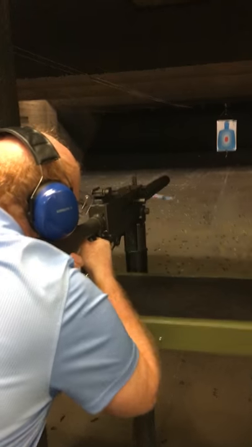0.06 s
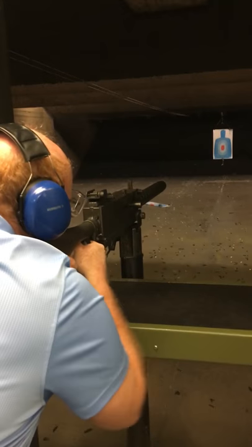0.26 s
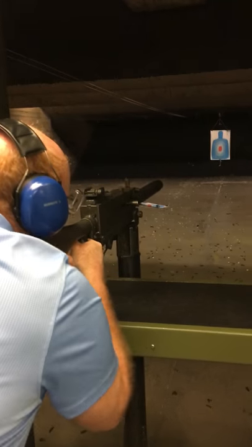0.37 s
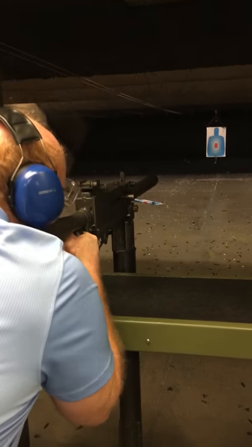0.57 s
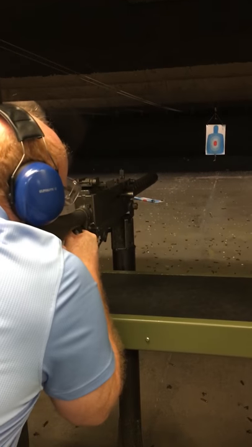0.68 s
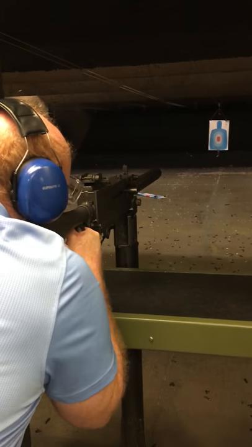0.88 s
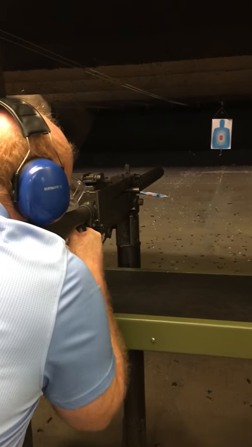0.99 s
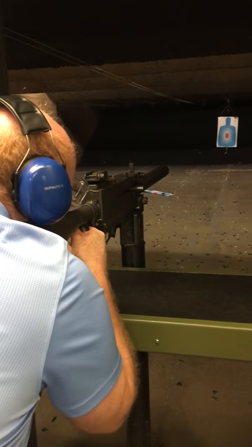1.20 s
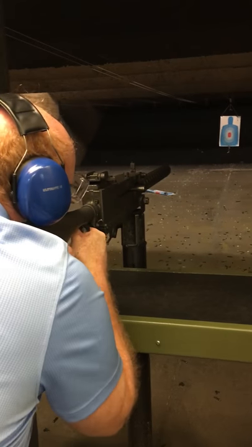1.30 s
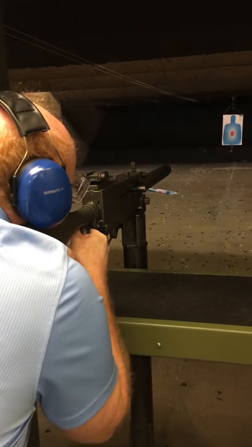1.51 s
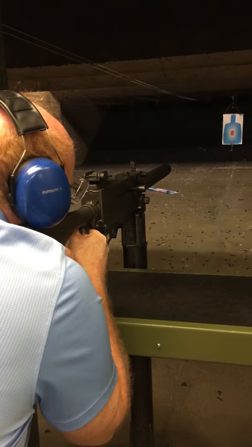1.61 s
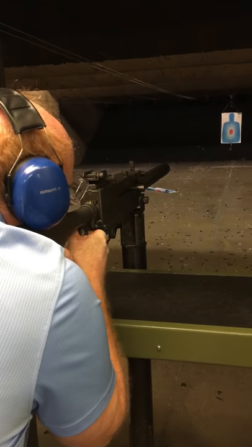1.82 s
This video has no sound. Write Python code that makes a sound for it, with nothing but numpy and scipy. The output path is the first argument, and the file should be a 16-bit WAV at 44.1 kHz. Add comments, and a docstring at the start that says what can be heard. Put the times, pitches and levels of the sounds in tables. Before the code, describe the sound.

One heavy gunshot cracks and roars indoors, echoes down a long hall, then spent cases tinkle

```python
"""Brass cases jingle on concrete over ventilation, then a mounted machine gun fires one round in an indoor range.
The bolt is noise that swells until the shot; the blast is decaying pulses plus shaped noise for the booth.
A slower noise tail, a low sine and an echo make the long hall; cases and belt links are ringing modes
and scraping noise. Gain control ducks everything after the shot, and the loudest peaks overload."""
import sys
import numpy as np
from scipy import signal
from scipy.fft import rfft, irfft, next_fast_len
from scipy.io import wavfile
from scipy.ndimage import uniform_filter1d, minimum_filter1d

SR = 44100
rng = np.random.default_rng(int(sys.argv[2]) if len(sys.argv) > 2 else 0)


def generate_wav(signal):
    """Clip the signal to [-1, 1] and save it as 16-bit WAV at the path in sys.argv[1]."""
    frames = np.transpose(np.atleast_2d(signal))
    scaled = np.clip(frames, -1, 1) * 32767
    pcm = np.round(scaled).astype(np.int16)
    wavfile.write(sys.argv[1], SR, pcm)


N = 81585
T = np.arange(N) / SR
SHOT_S = 0.2385

# Ring modes of a brass case. Each row: centre frequency in Hz, relative level in dB, T60 in seconds.
BRASS_MODES = [(7640, -13, 0.21), (8120, -4.5, 0.22), (9790, -5.5, 0.3), (10790, -9, 0.3),
               (10840, -0.5, 0.37), (11050, 0, 0.17), (10800, -11, 0.13), (12000, -3.5, .2),
               (12060, -0.5, 0.27), (14700, -10, .2), (15810, 0, 0.48)]
# Colour of brass knocking and scraping on concrete. Each row: frequency in Hz, relative level in dB per Hz.
CLACK_SPECTRUM = [(500, -11), (2500, -5), (4000, 1.5), (5200, -0.5), (7000, 3), (10000, 0), (12500, -3.5),
                  (13600, -7), (15500, -3)]


def amp(db):
    """Decibels to gain."""
    return 10 ** (np.asarray(db) / 20)


def unit(x):
    """Scales to rms 1."""
    return x / np.sqrt(np.mean(x ** 2) + 1e-20)


def read(points, hz):
    """Interpolates a table on a log-frequency axis."""
    f, value = np.transpose(points)
    return np.interp(np.log(hz + 1), np.log(f + 1), value)


def over_time(points):
    """Interpolates a table of (seconds, dB) along the scene."""
    return np.interp(T, *np.transpose(points))


def noise(spectrum):
    """Steady noise of the given colour, rms 1."""
    size = next_fast_len(N)
    gain = amp(read(spectrum, np.fft.rfftfreq(size, 1 / SR)))
    return unit(irfft(rfft(rng.standard_normal(size)) * gain, size)[:N])


def resonance(hz, width_hz):
    """Noise in one narrow resonance, rms 1."""
    size = next_fast_len(N)
    detune = (np.fft.rfftfreq(size, 1 / SR) - hz) / width_hz
    gain = 1 / (1 + 2 * detune ** 2)
    return unit(irfft(rfft(rng.standard_normal(size)) * gain, size)[:N])


def decay(start_s, t60_s, rise_s=0.00031):
    """Envelope that rises linearly at the start and dies away exponentially."""
    age_s = np.maximum(T - start_s, 0)
    return np.minimum(age_s / rise_s, 1) * amp(-60 * age_s / t60_s)


def reverberation(spectrum, fill, hold, t60):
    """Dense reflections of the shot: each band glides to its held level, then dies at its own speed."""
    hz, t, bands = signal.stft(noise(spectrum), SR, nperseg=256, noverlap=192)
    fill_db, hold_s, t60_s = (read(table, hz)[:, None] for table in (fill, hold, t60))
    late_s = t - SHOT_S - hold_s  # time since the end of the hold
    db = fill_db * np.clip(-late_s / hold_s, 0, 1) - 60 * np.maximum(late_s, 0) / t60_s
    return signal.istft(bands * amp(db), SR, nperseg=256, noverlap=192)[1][:N]


def ventilation():
    """Duct rumble and rushing air, both slowly varying, under faint resonant fan tones."""
    # Each row: frequency in Hz, relative level in dB per Hz.
    rumble_spectrum = [(20, -14.5), (30, -15), (45, -2.5), (68, 1.5), (85, -10), (110, -15.5), (200, -24.5),
                       (500, -72)]
    air_spectrum = [(40, -18), (130, 3), (200, 8.5), (400, -1), (1000, 2), (1800, 3), (2800, -7),
                    (5000, -19), (15000, -38.5)]
    # Each row: time in seconds, gain in dB.
    rumble_swell = [(0, 2), (.08, 1), (.2, 0), (1.1, -1.5), (1.33, -0.5), (1.44, 3.5), (1.55, -2),
                    (1.72, 0), (1.85, 1)]
    air_swell = [(0, 2.5), (.22, 2), (1.1, 0), (1.45, -.5), (1.85, -2)]
    # Each row: frequency in Hz, nominal width in Hz, level in dB.
    fan_tones = [(316, 40, -52), (504.7, 18, -53), (1046, 60, -50.5)]
    rumble_db, air_db = -36, -41.5
    rumble = amp(rumble_db + over_time(rumble_swell)) * noise(rumble_spectrum)
    air = amp(air_db + over_time(air_swell)) * noise(air_spectrum)
    fan = sum(amp(db) * resonance(hz, width_hz) for hz, width_hz, db in fan_tones)
    return rumble + air + fan


def links():
    """Steel belt links clatter down as decaying resonances, lower and duller than the brass."""
    # Each row: start in seconds, level in dB, frequency in Hz.
    link_hits = [(1.3114, -49, 4580), (1.4266, -40.5, 4130), (1.459, -42, 4040), (1.485, -44, 4000),
                 (1.664, -38, 4420), (1.677, -36.5, 3860), (1.715, -44, 3900), (1.77, -41, 4370)]
    width_hz, t60_s = 300, 0.17
    return sum(amp(db) * resonance(hz, width_hz) * decay(start_s, t60_s, rise_s=0.0014)
               for start_s, db, hz in link_hits)


def skitter():
    """Several cases roll and tumble: random small knocks keep their modes ringing over a grainy scrape."""
    # Each row: time in seconds, scrape level in dB, ring level in dB.
    skitter_levels = [(0, -35, -34.5), (.07, -33, -32.5), (0.191, -32.5, -30), (0.239, -36.5, -34.5),
                      (0.478, -39, -36.5), (.66, -49, -42), (.8, -68, -65), (1.08, -70, -78.5),
                      (1.131, -54, -59.5), (1.25, -52.5, -52), (1.42, -60, -61), (1.6, -51, -47),
                      (1.65, -38.5, -45), (1.7, -35.5, -34), (1.791, -39, -34), (1.85, -42, -46)]
    knocks_per_s, case_count = 140, 5  # rate shared by all cases
    mode_spread = 0.0046  # relative standard deviation of mode frequency
    grain_depth, grain_s = 0.19, 0.0017
    t = T[:SR // 4]
    ring = np.zeros(N)
    for _ in range(case_count):
        knocks = rng.random(N + len(t) - 1) < knocks_per_s / case_count / SR
        for hz, db, t60_s in BRASS_MODES:
            mode_hz = hz * (1 + mode_spread * rng.standard_normal())
            mode = amp(db - 60 * t / t60_s) * np.sin(2 * np.pi * mode_hz * t)
            strikes = knocks * rng.standard_normal(len(knocks))
            ring += signal.fftconvolve(strikes, mode, "valid")
    smooth = uniform_filter1d(rng.standard_normal(N), max(int(grain_s * SR), 2))
    scrape = noise(CLACK_SPECTRUM) * np.exp(grain_depth * unit(smooth))
    time_s, scrape_db, ring_db = np.transpose(skitter_levels)
    ring_gain = amp(np.interp(T, time_s, ring_db))
    scrape_gain = amp(np.interp(T, time_s, scrape_db))
    return ring_gain * unit(ring) + scrape_gain * unit(scrape)


def landings():
    """Each case clacks on concrete and rings, mostly in modes near one pitch; the room's reflections blur the ring."""
    # Each row: start in seconds, clack level in dB, ring level in dB, most excited frequency in Hz.
    case_landings = [(.068, -49, -33, 15500), (.103, -43.5, -34, 9850), (.152, -49.5, -30, 12250),
                     (.178, -48.5, -28, 8190), (1.275, -49.5, -42.5, 10380), (1.3097, -46, -39, 10550),
                     (1.4281, -41.5, -42, 12460), (1.447, -39, -34, 15500), (1.497, -45, -43, 12260),
                     (1.577, -49, -40, 12400), (1.6082, -54, -36, 10950), (1.6511, -49, -30, 11510),
                     (1.69, -48, -36, 9800), (1.7155, -32.5, -29.5, 10150), (1.7424, -47, -31, 10030),
                     (1.778, -35, -24, 11460)]
    blur_hz, focus_width_hz, off_focus_gain = 70, 353, 0.13
    clack_t60_s, tick_gain, tick_s = 0.33, 0.363, 0.0046
    out = np.zeros(N)
    hz, db, t60_s = np.transpose(BRASS_MODES)
    modes = [resonance(f, blur_hz) for f in hz]
    for start_s, clack_db, ring_db, focus_hz in case_landings:
        focus = np.exp(-((hz - focus_hz) / focus_width_hz) ** 2)
        weights = amp(db) * (off_focus_gain + focus)
        weights = weights / np.linalg.norm(weights)
        for mode, weight, ring_s in zip(modes, weights, t60_s):
            shifted = np.roll(mode, rng.integers(N))  # a fresh stretch of noise for each landing
            out += amp(ring_db) * weight * decay(start_s, ring_s) * shifted
        tick = 1 + tick_gain * np.exp(-np.maximum(T - start_s, 0) / tick_s)
        out += amp(clack_db) * noise(CLACK_SPECTRUM) * decay(start_s, clack_t60_s) * tick
    return out


def hall():
    """The long range fills slowly, booms at one low mode and sends an echo from its far end."""
    # Each row: frequency in Hz, relative level in dB per Hz.
    hall_spectrum = [(24, -34), (40, -20), (54, -6.5), (158, 2.5), (244, -5), (286, -5), (531, -5),
                     (732, -6), (941, -4.5), (1030, -8.5), (2300, -15), (9500, -34), (12400, -71),
                     (20900, -120)]
    echo_spectrum = [(40, -7), (150, -9), (900, 1), (2000, -12), (8000, -35)]
    # Each row: frequency in Hz, gain in dB at the shot against the end of the hold.
    hall_fill = [(60, 3), (600, -1.5), (3000, 0)]
    # Each row: frequency in Hz, hold in seconds.
    hall_hold = [(60, 0.18), (500, 0.32), (2000, .32), (8000, 0.25)]
    # Each row: frequency in Hz, T60 in seconds.
    hall_t60 = [(60, 2.3), (170, 1.26), (500, 1.124), (1200, 1.26), (3000, 1.23), (6000, 0.71),
                (12000, 0.3)]
    # Boom between floor and ceiling: frequency in Hz, level in dB, T60 in seconds.
    boom_mode = (180, -24, 1.83)
    # Echo: start in seconds, level in dB, T60 in seconds.
    far_wall = (0.51, -10, 0.085)
    tail_db, build_s, build_power = -11, 0.24, 1.9
    build = np.clip((T - SHOT_S) / build_s, 0, 1) ** build_power
    tail = amp(tail_db) * reverberation(hall_spectrum, hall_fill, hall_hold, hall_t60) * build
    echo_s, echo_db, echo_t60_s = far_wall
    echo = amp(echo_db) * noise(echo_spectrum) * decay(echo_s, echo_t60_s, rise_s=0.0017)
    boom_hz, boom_db, boom_t60_s = boom_mode
    # the boom starts with the echo
    boom = amp(boom_db) * np.sin(2 * np.pi * boom_hz * T) * decay(echo_s, boom_t60_s, rise_s=0.0067)
    return tail + echo + boom


def bolt():
    """The bolt runs forward as coloured noise, louder and louder until the round fires."""
    # Each row: frequency in Hz, relative level in dB per Hz.
    bolt_spectrum = [(40, -2), (200, 5.5), (700, -9.5), (1500, -9.5), (2300, -23), (3000, -11),
                     (3700, -25.5), (15000, -36.5)]
    start_s, start_db, rise_db_per_s = 0.2182, -27.5, 650
    running = (T > start_s) & (T < SHOT_S)
    level_db = start_db + rise_db_per_s * (np.minimum(T, SHOT_S) - start_s)
    return noise(bolt_spectrum) * running * amp(level_db)


def steel():
    """Barrel and receiver clang briefly with the shot, as decaying narrow resonances."""
    # Each row: frequency in Hz, nominal width in Hz, level in dB, T60 in seconds.
    steel_modes = [(1089, 50, -4.5, 0.19), (1453, 42, -4.5, 0.24), (1697, 200, -6.5, .15),
                   (2850, 300, -7, 0.25)]
    return sum(amp(db) * resonance(hz, width_hz) * decay(SHOT_S, t60_s)
               for hz, width_hz, db, t60_s in steel_modes)


def shock_pulse(u):
    """Pressure jump, fast fall and undershoot; u is age over pulse length."""
    return (1 - u) * np.exp(-u)


def slaps():
    """Scattered shock reflections off baffles and partitions make the roar crackle."""
    slaps_per_s, level_db, length_s = 300, 10.5, 0.0003
    hold_s, t60_s = 0.08, 0.11
    hits = (rng.random(N) < slaps_per_s / SR) & (T > SHOT_S)
    fade_db = -60 * np.maximum(T - SHOT_S - hold_s, 0) / t60_s
    pulse = shock_pulse(np.arange(SR // 100) / SR / length_s)
    return signal.oaconvolve(hits * amp(level_db + fade_db), pulse)[:N]


def blast():
    """Shock front and its slaps off the booth, with the roar of dense booth reflections."""
    # Each row: start in seconds, peak in dB, length in seconds.
    shocks = [(0.2398, 13, .0005), (0.2424, 20, .0002), (0.259, 16, .0002), (0.268, 1.5, .00025),
              (.3285, 18, .0001)]
    # Each row: frequency in Hz, relative level in dB per Hz.
    booth_spectrum = [(20, -17), (30, -14), (40, -20), (56, 2), (75, -7), (100, -4), (130, -2.5),
                      (197, -1.5), (300, -3), (430, -2.5), (660, -3.5), (1000, -7), (1500, -15),
                      (1900, -16.5), (2800, -18.5), (3800, -19.5), (5900, -19.5), (9000, -25),
                      (11000, -30.5), (15500, -34.5)]
    # Each row: frequency in Hz, gain in dB at the shot against the end of the hold.
    booth_fill = [(60, -4), (600, -4.5), (1300, -3), (2500, -1.5), (6000, -4.5), (14000, -2.5)]
    # Each row: frequency in Hz, hold in seconds.
    booth_hold = [(60, 0.12), (500, 0.088), (2000, 0.1), (5000, 0.094), (8500, 0.1), (11000, .08),
                  (14000, 0.067)]
    # Each row: frequency in Hz, T60 in seconds.
    booth_t60 = [(60, 0.4), (300, 0.28), (1000, 0.29), (4000, 0.26), (8000, 0.2), (14000, 0.26)]
    roar_db, build_s = 8.5, 0.0018
    build = np.clip((T - SHOT_S) / build_s, 0, 1)
    out = amp(roar_db) * reverberation(booth_spectrum, booth_fill, booth_hold, booth_t60) * build
    for start_s, peak_db, length_s in shocks:
        u = np.maximum(T - start_s, 0) / length_s
        out = out + amp(peak_db) * (T >= start_s) * shock_pulse(u)
    return out


def scene():
    """Sums everything that reaches the microphone into one channel."""
    background = ventilation() + links() + skitter() + landings()
    shot = hall() + bolt() + steel() + slaps() + blast()
    return (background + shot)[None]


def record(dry):
    """Gain control drops fast, holds and recovers slowly; peaks overload softly; then a low-pass."""
    sense_s, limit_db, hold_s, recover_db_per_s = 0.01, -7, 0.57, 27
    ceiling, edge_hz = 1.04, 15800
    r = np.exp(-1 / (sense_s * SR))
    power = signal.lfilter([1 - r], [1, -r], dry[0] ** 2)
    over_db = np.maximum(10 * np.log10(power + 1e-12) - limit_db, 0)
    half = int(hold_s * SR / 2)
    # origin=half makes the window look back only
    held_db = -minimum_filter1d(-over_db, 2 * half + 1, origin=half, mode="constant")
    recovery_db = recover_db_per_s * T
    duck_db = np.maximum.accumulate(held_db + recovery_db) - recovery_db
    loud = ceiling * np.tanh(dry * amp(-duck_db) / ceiling)
    low_pass = signal.firwin(511, edge_hz, window=("kaiser", 9), fs=SR)
    return signal.oaconvolve(loud, low_pass[None], "same")


dry = scene()
out = record(dry)
generate_wav(out)
```